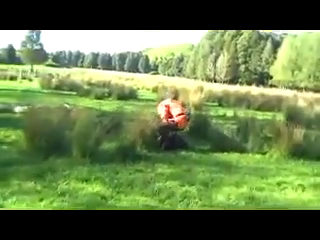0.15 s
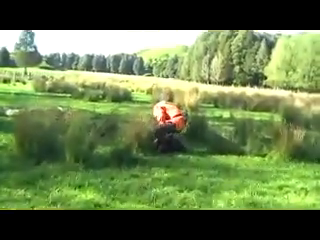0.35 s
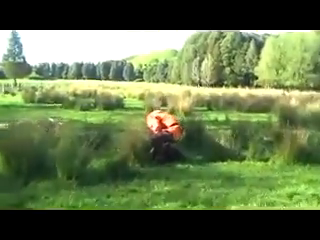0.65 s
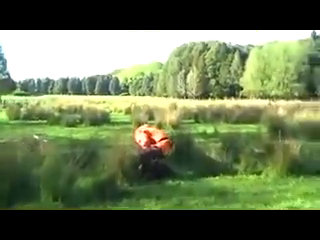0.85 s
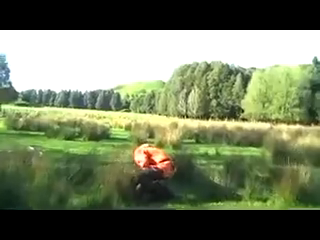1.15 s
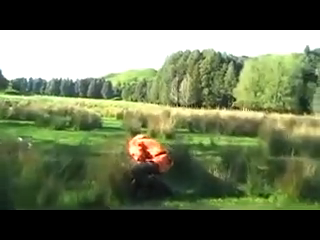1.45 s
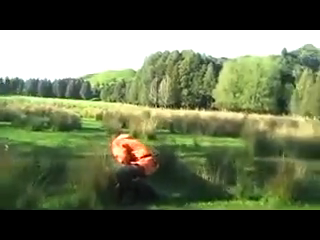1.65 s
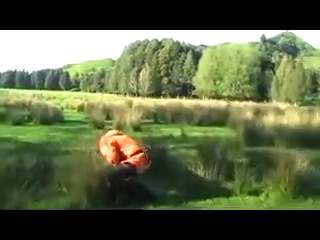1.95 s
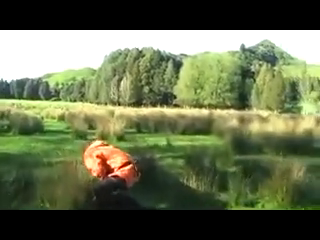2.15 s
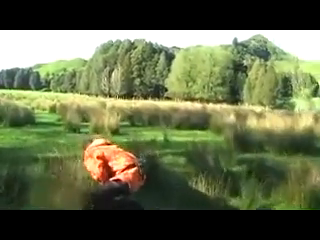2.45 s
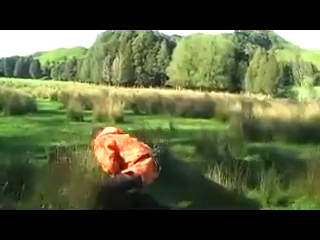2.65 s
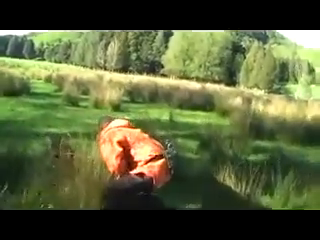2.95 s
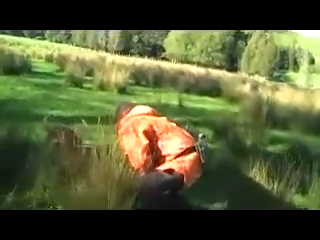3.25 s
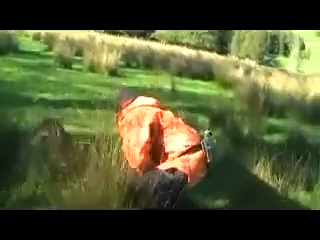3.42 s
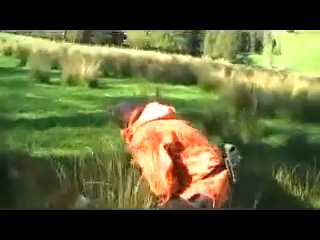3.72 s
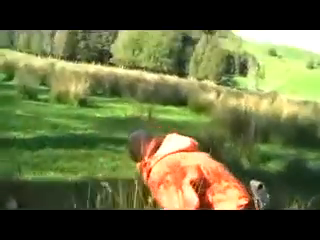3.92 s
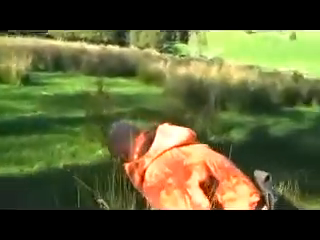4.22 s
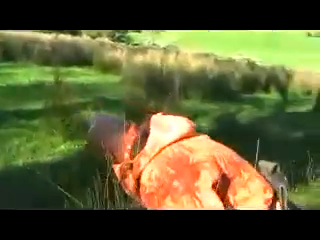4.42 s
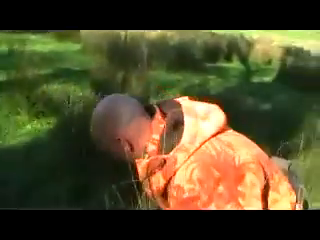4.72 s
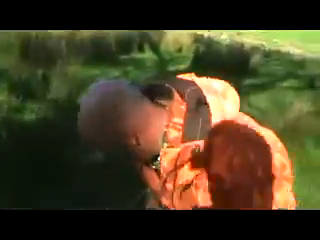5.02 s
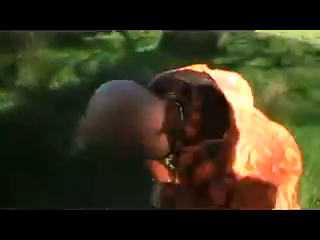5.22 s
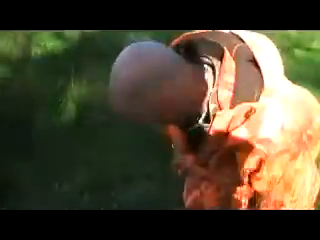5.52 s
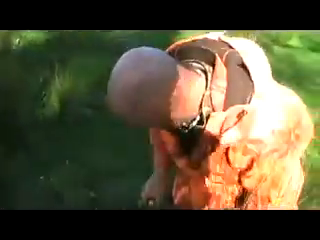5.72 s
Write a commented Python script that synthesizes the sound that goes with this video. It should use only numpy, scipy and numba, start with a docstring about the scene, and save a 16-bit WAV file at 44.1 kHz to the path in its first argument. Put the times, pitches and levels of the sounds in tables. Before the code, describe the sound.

Raspy, shrill young pig squeals, nearly continuous outdoors, split by short pauses, with feet thudding and dry grass crackling close to a handheld camera.

```python
"""A piglet held in long grass squeals four hoarse cries while a hand-held tape camera walks up to it.
Uneven fold beats chop noisy breath and click; throat resonances ring with both, and whistles lock in.
A tree line echoes the cries as scattered noise. Grass is fine grains of noise; knocks and snaps are
ringing bursts. Field and wind noise lie underneath. The camera combs out its drum buzz and limits peaks."""
import sys
import numpy as np
from scipy import signal
from scipy.fft import rfft, irfft
from scipy.io import wavfile
from scipy.ndimage import uniform_filter1d
from numba import njit

SR = 44100
rng = np.random.default_rng(int(sys.argv[2]) if len(sys.argv) > 2 else 0)


def transcribe(signal):
    """Save signal, clipped to [-1, 1], as a 16-bit WAV file at the path in sys.argv[1]."""
    frames = np.atleast_2d(signal).T
    limited = np.clip(frames, -1, 1)
    pcm = np.round(limited * 32767).astype(np.int16)
    wavfile.write(sys.argv[1], SR, pcm)


N = 258867
T = np.arange(N) / SR


def undb(db):
    """Turn decibels into a plain gain."""
    return 10 ** (np.asarray(db) / 20)


def unit(x):
    """Scale a signal to rms 1."""
    return x / np.sqrt(np.mean(x ** 2))


def curves(rows):
    """Join the columns of (time_s, ...) rows by straight lines over the whole scene."""
    s, *columns = np.transpose(rows)
    return [np.interp(T, s, column) for column in columns]


def bell(s, spread_s):
    """A smooth swell, 1 at its middle, round one moment."""
    return np.exp(-.5 * ((T - s) / spread_s) ** 2)


@njit
def svf(x, hz, width):
    """State-variable band-pass with a moving centre, gain 1 there."""
    y, state_1, state_2 = np.empty(len(x)), 0., 0.
    for i in range(len(x)):
        g, k = np.tan(np.pi * hz[i] / SR), width / hz[i]
        v = (state_1 + g * (x[i] - state_2)) / (1 + g * (g + k))
        state_1 = 2 * v - state_1
        state_2 = state_2 + 2 * g * v
        y[i] = k * v
    return y


def band(x, hz, width):
    """Apply the band-pass twice, then scale to rms 1."""
    hz = hz * np.ones(len(x))
    once = svf(x, hz, 1. * width)
    return unit(svf(once, hz, 1. * width))


def walk(rate):
    """A slow random curve, rms 1: levels held for 1 / rate seconds, then smoothed twice."""
    k = int(SR / rate)
    steps = np.repeat(rng.standard_normal(N // k + 1), k)
    smooth = uniform_filter1d(uniform_filter1d(steps, k), k)
    return unit(smooth[:N])


def shaped(points):
    """Noise with a spectrum given as (pitch_hz, level_db), scaled to rms 1."""
    hz, db = np.transpose(points)
    log_hz = np.log(np.fft.rfftfreq(N, 1 / SR) + 1)
    gain = undb(np.interp(log_hz, np.log(hz), db))
    return unit(irfft(rfft(rng.standard_normal(N)) * gain, N))


# How far each cry opens; release begins at end_s: (start_s, end_s, attack_s, release_s)
CRY_TIMES = [(-0.1, 1.668, 0.02, 0.085), (2.027, 3.382, 0.034, 0.035), (3.714, 4.432, 0.012, 0.032),
             (4.75, 5.7, 0.002, 0.045)]
SILENT_DB = -40  # depth from which a cry rises and to which it falls


def cries():
    """Opening of the cries, 0 to 1: each rises quickly, holds and falls."""
    opening = np.zeros(N)
    for start, end, attack_s, release_s in CRY_TIMES:
        rise = np.sqrt(np.clip((T - start) / attack_s, 0, 1))
        fall = np.clip(1 - (T - end) / release_s, 0, 1)
        opening += (rise * fall > 0) * undb(SILENT_DB * (1 - rise * fall))
    return opening


# Mean beat of the vocal folds and level of their tone, one list a cry: (time_s, beat_hz, tone_db)
FOLD_BEATS = [
    [(0, 240.1, -39), (.7, 247.5, -35.5), (1.0, 253.6, -39.5), (1.55, 256.9, -37.5), (1.67, 246, -35),
     (1.72, 209, -18)],
    [(2.02, 207.2, -21), (2.07, 211.4, -32), (2.1, 251.7, -42), (2.166, 275, -33), (2.49, 276.1, -29),
     (2.55, 255.2, -32.5), (2.886, 249.4, -33), (2.926, 202.7, -30.5), (3.41, 203.2, -31.5)],
    [(3.71, 210.2, -25.5), (3.86, 219.9, -34), (4.46, 212.3, -38)],
    [(4.74, 196.7, -41), (4.83, 220.3, -39), (5.0, 216, -40), (5.06, 256.1, -33), (5.29, 235.2, -33),
     (5.35, 235.1, -39), (5.44, 285.6, -33.5), (5.74, 270.3, -34)],
]
# How broken the fold beat is: (time_s, roughness from 0 to 1)
ROUGHNESS = [(0, .9), (.3, .5), (.75, .3), (1.65, .25), (1.7, .9), (2.1, .8), (2.2, .5), (2.5, .5),
             (2.56, .28), (2.89, .28), (2.92, .9), (3.7, .9), (3.9, .6), (4.4, .6), (4.75, .9), (5.0, .9),
             (5.08, .55), (5.3, .6), (5.4, .95)]


def fold_beats():
    """Uneven beating of the vocal folds; rougher folds wander further from their mean beat."""
    rough, = curves(ROUGHNESS)
    beat_hz, tone_db = curves(np.vstack(FOLD_BEATS))
    wander = np.exp(.2 * rough ** 2 * walk(150))
    phase = np.cumsum(beat_hz * wander) / SR  # counted in beats
    return rough, beat_hz, tone_db, phase


def airflow(rough, phase):
    """Torn breath: noise that bursts and fades in each beat, alone and with a click of uneven strength."""
    cycle = phase.astype(int)
    click_gain = undb(2.5 * rng.standard_normal(N // 100))
    clicks = np.diff(cycle, prepend=0) * click_gain[cycle]
    puffs = .4 + np.exp(-(phase % 1) / .3)
    air = unit(puffs * rng.standard_normal(N))
    return air, air + 0.9 * (1 - .45 * rough) * unit(clicks)


def fold_tone(rough, beat_hz, tone_db, phase):
    """A steady beat hums with one overtone; a broken one growls round the same pitch."""
    hum = np.sqrt(2) * (np.sin(2 * np.pi * phase) + 0.59 * np.sin(4 * np.pi * phase))
    growl = undb(0.5) * band(rng.standard_normal(N), beat_hz, 100)
    return undb(tone_db) * ((1 - rough) * hum + rough * growl)


# Quick pushes and lapses of breath: (time_s, swell_db, spread_s)
BREATH_PUSHES = [(0.69, 2.5, 0.029), (1.346, -2, 0.0068), (1.543, 2.5, 0.0076), (1.58, 2, 0.0051),
                 (2.043, 3, 0.016), (2.458, 4, 0.033), (2.53, -1, 0.015), (2.589, 4, 0.021),
                 (2.874, -1.5, 0.0094), (2.901, 2, 0.0071), (3.049, 0.5, 0.013), (3.775, 3, 0.015),
                 (3.807, -5, 0.0079), (3.84, 3, 0.015), (3.866, -4.5, 0.0045), (3.88, 1.5, 0.0074),
                 (3.963, -0.5, 0.0082), (4.005, 4, 0.0075), (4.029, -3, 0.0062), (4.049, 4.5, 0.0082),
                 (4.11, 5, 0.0088), (4.197, 4.5, 0.018), (4.265, 5, 0.0097), (4.324, 4.5, 0.011),
                 (4.365, 5, 0.015), (4.385, 4.5, 0.0037), (4.748, 4, 0.003), (4.778, 5, 0.014),
                 (5.069, 2, 0.0068), (5.111, -1, 0.0076), (5.347, 1.5, .015)]


def breath_pushes():
    """Add up the short swells and dips of breath, in dB."""
    return sum(db * bell(s, spread_s) for s, db, spread_s in BREATH_PUSHES)


# Shapes of throat and mouth by name: nine resonances (pitch_hz, strength_db),
# then one pair for the chest and the hiss (chest_db, hiss_db)
MOUTH_SHAPES = { "wide": [(770, -7), (1040, -52), (1570.5, -2.5), (2050, -8), (2519.5, -8), (2899.5, -17.5),
                (3979.5, -12), (4750, -28), (5950, -15), (-23.5, -27)], "bright": [(777.5, -10),
                (1044.5, -56), (1580, -6.5), (2048.5, -9), (2480, -10), (2900.5, -14), (3981, -15),
                (4900, -22), (6149.5, -16.5), (-25.5, -26)], "shrill": [(760, -15.5), (1020, -36),
                (1580, -7.5), (2050, -12.5), (2530, -1.5), (2870, -24), (3950, -14), (4950, -20),
                (6450, -18.5), (-25.5, -22)], "slack": [(697.5, -7), (1180.5, -3.5), (1481, -8),
                (1917.5, -11.5), (2300, -13), (2850, -20), (3649, -34), (4885.5, -24), (5697, -32),
                (-18.5, -29.5)], "closing": [(747.5, -7.5), (1150, -20), (1660, -4.5), (1860, -5),
                (2050, -7.5), (2750, -7.5), (4100, -14.5), (4900.5, -22), (6100, -17.5), (-24, -28)],
                "strained": [(740, -13), (970, -15), (1600, -8.5), (1870, -8.5), (2520, -12), (2940, -13.5),
                (4150, -37), (4400, -14), (6800.5, -23.5), (-24, -22)], "gaping": [(801, -13), (1131, -0.5),
                (1540, -2), (1922.5, -7), (2697.5, -26), (2858.5, -17), (3624, -28), (4865, -19),
                (6103, -18), (-15, -23)], "pinched": [(760, -14), (1020, -21), (1640, -3.5), (2000, -5.5),
                (2530, -4), (2880.5, -13.5), (4049.5, -13.5), (4900, -22), (6251, -18.5), (-24, -20.5)],
                "half shut": [(758.5, -8), (1150.5, -9), (1560, 0), (1880, -29), (2500, -14), (2920, -19.5),
                (3598.5, -22), (4798.5, -22), (6249, -22), (-24, -21.5)], "rasping": [(722, -11),
                (990, -13.5), (1620, -7), (1890, -10.5), (2400, -12), (2910, -14), (4100, -29),
                (4900.5, -12.5), (6601.5, -21), (-23, -21.5)], "narrow": [(760.5, -11), (1000.5, -13),
                (1680.5, 0), (1851, -5), (2449, -11.5), (2980, -22), (3900, -23), (4799.5, -22),
                (6102, -21.5), (-24, -26)], "hollow": [(835.5, -24.5), (980, 1), (1690, -5), (1880, -5),
                (2600, -15.5), (2900, -17.5), (3500, -33), (5001, -23.5), (5952.5, -31.5), (-29.5, -40.5)],
                "barking": [(769.5, -11), (1150, -8), (1569.5, -3.5), (1871, -4), (2550.5, -12.5),
                (3150, -19), (4001, -25), (5200, -21.5), (6798.5, -44), (-24.5, -32)], "round": [(781, -15),
                (1129.5, -6.5), (1420, -4), (1939, -12), (2250, -16), (2800.5, -16), (3638.5, -19),
                (5248.5, -23), (6094, -40), (-24.5, -45)], }
# The mouth slides from shape to shape: (time_s when reached, shape name)
MOUTH_MOVES = [(0, "wide"), (0.847, "bright"), (1.05, "bright"), (1.201, "shrill"), (1.279, "pinched"),
               (1.48, "pinched"), (1.58, "shrill"), (1.661, "closing"), (1.75, "closing"),
               (1.999, "half shut"), (2.085, "half shut"), (2.11, "rasping"), (2.2, "rasping"),
               (2.42, "strained"), (2.89, "narrow"), (2.97, "hollow"), (3.42, "hollow"), (3.7, "half shut"),
               (3.748, "half shut"), (3.775, "barking"), (4.15, "barking"), (4.43, "hollow"),
               (4.7, "half shut"), (4.749, "half shut"), (4.772, "gaping"), (4.82, "round"),
               (5.199, "round"), (5.6, "slack"), (5.87, "slack")]
# Filter width of each of the nine resonances, lowest first: width_hz
RESONANCE_WIDTHS = [240, 340, 340, 360, 380, 430, 560, 700, 1250]
DRIFT, SHIFT_DB = .01, .5  # wander of each resonance in pitch (share) and strength as the animal struggles
PUSH_TREBLE = 0.39  # a push lifts the hiss, leak and upper resonances by this share more
TREMBLE_HZ = 22  # strength of the quick pitch tremble, wider at higher pitch


def throat(air, source, push_db):
    """Chest, hiss and nine sliding resonances ring with the breath; each resonance also whistles."""
    rows = [(s, *np.ravel(MOUTH_SHAPES[name])) for s, name in MOUTH_MOVES]
    *mouth, chest_db, hiss_db = curves(rows)
    chest = undb(chest_db) * band(source, 371, 120)
    hiss = undb(hiss_db + PUSH_TREBLE * push_db) * band(air, 7460, 4100)
    ringing = chest + hiss
    for k, (hz, db, width) in enumerate(zip(mouth[::2], mouth[1::2], RESONANCE_WIDTHS)):
        hz = hz * (1 + DRIFT * walk(6))
        db = db + SHIFT_DB * walk(4.97) + PUSH_TREBLE * push_db * (hz > 3300)
        broad = band(source, hz, width)
        # a wavering strand that swells and fades at random
        waver_hz = .006 * hz * walk(12) + TREMBLE_HZ * np.sqrt(hz / 1000) * walk(160)
        strand = np.sqrt(2) * np.sin(2 * np.pi * np.cumsum(hz + waver_hz) / SR)
        strand = strand * undb(2.5 * walk(30))
        share = .5 * min((k + 1) / 3, 1)  # the lowest resonances whistle least
        # neighbouring resonances have opposite signs
        ringing = ringing + (-1) ** k * undb(db + 1.2 * walk(20)) * unit(broad + share * strand)
    # the scream holds its strength: short swells are partly evened out
    slow_power, quick_power = uniform_filter1d(ringing ** 2, 6000), uniform_filter1d(ringing ** 2, 900)
    return ringing * (slow_power / quick_power) ** .3


# Where the voice locks on one gliding pitch: (start_s, end_s, from_hz, to_hz, level_db before flicker)
WHISTLE_GLIDES = [(0, .35, 3970, 3960, -37), (.35, .73, 4000, 4060, -37), (0, .3, 5880, 6100, -44),
                  (.3, .56, 5920, 6140, -36), (.1, .7, 4730, 4760, -49), (.55, .9, 6440, 6270, -41),
                  (.62, .95, 5770, 5550, -33), (.78, .88, 3830, 3700, -40), (.98, 1.2, 5840, 6350, -38.5),
                  (.2, .55, 2605, 2604, -31.5), (.27, .5, 1596, 1557, -25), (.22, .5, 2180, 2170, -31),
                  (1.05, 1.15, 1760, 1670, -32), (1.33, 1.47, 2650, 2730, -29),
                  (2.3, 2.75, 6990, 6700, -42.5), (2.55, 2.8, 6125, 6000, -37.5),
                  (2.33, 2.7, 3990, 3940, -38), (2.1, 2.22, 2290, 2300, -27),
                  (2.18, 2.36, 1720, 1760, -25.5), (2.42, 2.5, 1600, 1625, -25),
                  (2.7, 2.88, 1572, 1531, -24.5), (2.98, 3.12, 2636, 2600, -33),
                  (3.725, 3.79, 1300, 1618, -21.5), (3.82, 3.87, 1600, 1584, -19),
                  (3.78, 3.95, 2620, 2690, -34), (4.12, 4.33, 3120, 3200, -36.5),
                  (4.16, 4.29, 1594, 1574, -25.5), (4.77, 4.86, 2820, 2700, -39),
                  (4.85, 5.0, 1251, 1394, -26), (4.96, 5.26, 1160, 1125, -22.5),
                  (5.14, 5.45, 1370, 1256, -27), (5.27, 5.45, 4730, 4950, -37.5),
                  (5.48, 5.7, 3654, 3765, -41), (5.42, 5.6, 1122, 1090, -25), (5.45, 5.68, 1273, 1253, -29),
                  (0, .22, 1550, 1567, -28), (.02, .2, 2580, 2600, -22.5), (.27, .45, 825, 830, -31.5),
                  (.52, .74, 2170, 2177, -32.5), (.57, .67, 6030, 6150, -36), (.55, .9, 2615, 2610, -27.5),
                  (.69, .81, 2035, 2030, -23), (.72, .9, 819, 834, -29.5), (.88, 1.17, 2013, 2016, -24),
                  (.97, 1.08, 4035, 3960, -26), (1.09, 1.18, 2345, 2495, -18.5),
                  (1.12, 1.23, 4120, 4200, -27.5), (1.14, 1.22, 4500, 4320, -33),
                  (1.3, 1.44, 4160, 4190, -35), (1.49, 1.58, 3830, 3760, -33.5),
                  (1.17, 1.31, 2670, 2630, -25.5), (1.2, 1.36, 2010, 1976, -22.5),
                  (1.25, 1.4, 1680, 1741, -20.5), (1.41, 1.5, 2060, 2070, -22),
                  (1.52, 1.64, 2564, 2450, -19), (1.61, 1.675, 1993, 1823, -20),
                  (2.035, 2.092, 1543, 1570, -25), (2.09, 2.2, 4840, 4820, -29),
                  (2.14, 2.3, 2465, 2500, -27), (2.18, 2.5, 4580, 4310, -39), (2.3, 2.5, 2913, 2925, -32),
                  (2.41, 2.51, 1873, 1859, -22), (2.55, 2.7, 1856, 1848, -20),
                  (2.72, 3.0, 1775, 1708, -23.5), (2.92, 3.38, 949, 960, -25.5),
                  (3.0, 3.39, 1726, 1720, -27), (3.8, 3.9, 1893, 1900, -25.5), (3.9, 4.0, 3070, 3080, -39),
                  (4.16, 4.33, 1997, 1952, -26), (4.15, 4.33, 2635, 2760, -37),
                  (3.86, 3.93, 4110, 4100, -33), (3.97, 4.09, 1576, 1570, -23.5),
                  (4.3, 4.44, 1148, 980, -23.5), (4.54, 4.6, 700, 687, -44), (4.65, 4.75, 695, 699, -49),
                  (4.77, 4.96, 993, 1145, -19.5), (4.8, 4.97, 3647, 3910, -34),
                  (4.85, 5.45, 2798, 2650, -30.5), (4.88, 4.98, 4750, 5160, -33),
                  (5.03, 5.27, 4590, 4697, -34.5), (5.0, 5.14, 1398, 1380, -22.5),
                  (5.0, 5.3, 4080, 3950, -38), (4.93, 5.08, 5230, 5240, -37), (5.1, 5.5, 3603, 3551, -38),
                  (5.26, 5.42, 1135, 1130, -22.5), (5.33, 5.62, 4908, 4864, -55)]
WHISTLE_FADE_S = 0.021


def whistles():
    """Near-pure strands that glide, tremble in pitch and flicker in strength."""
    out = np.zeros(N)
    sway, tremble_hz, flicker = .004 * walk(25), TREMBLE_HZ * walk(200), undb(3.4 * walk(70))
    for k, (start, end, from_hz, to_hz, db) in enumerate(WHISTLE_GLIDES):
        first = max(int((start - WHISTLE_FADE_S) * SR), 0)
        last = min(int((end + WHISTLE_FADE_S) * SR), N)
        at = np.arange(first, last)
        own = (at + 9973 * k) % N  # every strand trembles its own way
        glide_hz = np.interp(T[at], [start, end], [from_hz, to_hz])
        tremble_scale = max(np.sqrt(from_hz / 2000), from_hz / 2500)
        hz = glide_hz * (1 + sway[own]) + tremble_hz[own] * tremble_scale
        edge_s = np.minimum(T[at] - start, end - T[at])
        fade = np.clip(edge_s / WHISTLE_FADE_S + .5, 0, 1) ** 2
        strand = np.sqrt(2) * np.sin(2 * np.pi * np.cumsum(hz) / SR)
        out[at] += undb(db) * fade * flicker[own] * strand
    return out


# Effort behind the voice: (time_s, level_db)
VOICE_EFFORT = [(0, -12), (.4, -17.5), (.73, -14), (1.08, -13.5), (1.3, -14.5), (1.5, -18.5), (1.66, -14.5),
                (2.05, -15), (2.39, -15), (2.6, -14), (2.85, -14), (3.38, -17.5), (3.72, -18.5),
                (3.75, -14.5), (4.43, -18.5), (4.75, -17), (4.79, -12), (5.63, -14), (5.7, -17.5)]
# Air that escapes the resonances, against the effort: (time_s, level_db)
AIR_LEAK = [(0, -29), (.7, -16), (.8, -21), (1.3, -21), (1.66, -24), (2.1, -29), (2.5, -34), (2.9, -29),
            (3.4, -27), (3.75, -19), (4.4, -30), (4.8, -23), (5.1, -25), (5.45, -29), (5.7, -27)]
FLUTTER_DB = 1.0  # random flutter of the effort
UNLOCKED_LEAST = .28  # least share of power left to the rasp while the voice whistles
TREES_DB, TREES_DB_PER_S = -11.5, -3.5  # echo share of the cry, falling as the camera comes near


def piglet():
    """Join rasp, fold tone and whistles into the cry; return it and the part sent to the trees."""
    rough, beat_hz, tone_db, phase = fold_beats()
    air, source = airflow(rough, phase)
    push_db = breath_pushes()
    ringing = throat(air, source, push_db)
    effort_db = curves(VOICE_EFFORT)[0] + FLUTTER_DB * walk(45) + push_db
    tone = fold_tone(rough, beat_hz, tone_db, phase)
    leak = undb(curves(AIR_LEAK)[0] + PUSH_TREBLE * push_db) * band(air, 3860, 3800)
    chop = (1 + .7 * np.cos(2 * np.pi * phase)) / 1.12  # the fold beat chops the whistles too
    strands = whistles() * undb(push_db) * chop
    # what the whistle takes of the breath, the rasp loses
    voice_power = uniform_filter1d(ringing ** 2, 6000) * undb(2 * effort_db)
    locked = uniform_filter1d(strands ** 2, 900) / voice_power
    rasp = (ringing + leak) * np.sqrt(np.clip(1 - locked, UNLOCKED_LEAST, 1))
    cry = cries() * (rasp * undb(effort_db) + tone) + strands
    return cry, cry * undb(TREES_DB + TREES_DB_PER_S * T)


TREES_T60_S = 0.44  # time for the echo tail to fall by 60 dB


def trees(x):
    """A thin scatter of echoes that dies away, duller than the cry, unlike on the two ports."""
    t = T[:SR]
    fade = undb(-60 * t / TREES_T60_S) * np.clip(t / 0.013, 0, 1)
    shared, side = rng.standard_normal((2, SR)) * fade
    tail = shared + 0.15 * side * np.array([[1], [-1]])
    tail = signal.lfilter([1], [1, -.6], tail)  # soften the treble
    tail = tail / np.sqrt(np.sum(tail[0] ** 2))
    return signal.fftconvolve(x[None], tail, axes=1)[:, :N]


# Grass brushing on legs: (time_s, level_db before the lift in each cry)
GRASS_LEVELS = [(0, -55), (1.8, -50), (2.02, -52.5), (3.42, -45), (3.5, -41), (3.63, -36), (3.71, -39.5),
                (4.47, -42.5), (4.65, -49), (4.676, -41.5), (4.72, -49.5), (4.75, -38.5), (5.74, -44.5),
                (5.77, -53.5), (5.87, -62)]
CRY_LIFT_DB = 3  # the rustle rises by this much in each cry


def grass():
    """Dense tiny grains of blades slipping past cloth, with a duller swish under them."""
    db = curves(GRASS_LEVELS)[0] + CRY_LIFT_DB * cries()
    grain_gain = undb(2 * rng.exponential(size=N // 40 + 1)).repeat(40)[:N]
    grains = rng.standard_normal(N) * grain_gain
    crisp = band(grains, 6500, 9000) * undb(2 * walk(18))
    swish = undb(3) * band(grains, 800, 1200) * undb(3 * walk(12))
    return undb(db) * (crisp + swish)


# Spectrum of the quiet field: (pitch_hz, relative level_db)
FIELD_SPECTRUM = [(59, -57), (100, -9), (176, 8), (599, 8), (718, 8.5), (860, -7), (1510, 3.5), (6830, -11),
                  (8020, -37), (12200, -39), (15900, -53), (22000, -120)]
FIELD_DB = -47


def field():
    """Steady shaped noise, partly shared by the two ports and partly separate."""
    shared = shaped(FIELD_SPECTRUM)
    separate = np.array([shaped(FIELD_SPECTRUM), shaped(FIELD_SPECTRUM)])
    return undb(FIELD_DB) * (shared + 0.86 * separate)


# Thuds of the hand-held camera, as swells of the rumble: (time_s, swell level_db, spread_s)
CAMERA_THUDS = [(1.168, -59, 0.034), (1.723, -36, 0.015), (2.031, -53, 0.018), (2.245, -54, 0.06),
                (3.63, -44, 0.064), (4.48, -56, 0.032), (4.779, -51, 0.051), (5.173, -54, 0.041),
                (5.49, -53, 0.044)]
RUMBLE_DB = -59  # base level of wind on the ports


def rumble():
    """Low noise of wind on the ports, swelling into a thud when the camera is jolted."""
    shared = band(rng.standard_normal(N), 142, 110)
    separate = np.array([band(rng.standard_normal(N), 72.4, 70) for _ in range(2)])
    thuds = sum(undb(db) * bell(s, spread_s) for s, db, spread_s in CAMERA_THUDS)
    swell = undb(RUMBLE_DB) + thuds
    return swell * undb(2 * walk(9.7)) * (shared + 0.63 * separate)


def bursts(events, width_share):
    """A sharp blow and a decaying noise tail, each event ringing round its own pitch."""
    out, t = np.zeros(N + 6000), T[:6000]
    noise = rng.standard_normal((len(events), 6000))
    for (s, db, hz, ring_s), n in zip(events, noise):
        blow = (n + 3 * (t == 0)) * undb(-60 * t / ring_s)
        hit = band(blow, hz, width_share * hz)
        first = int(s * SR)
        out[first:first + 6000] += undb(db) * hit / np.abs(hit).max()
    return out[:N]


# Dull knocks of feet and hands: (time_s, peak_db, pitch_hz, ring_s)
KNOCK_EVENTS = [(1.729, -23, 1800, 0.087), (3.504, -15, 800, 0.026), (3.506, -26, 213, 0.041),
                (3.574, -21, 705, 0.14), (3.577, -23, 234, 0.051), (3.609, -29, 196, 0.038),
                (3.59, -28, 843, 0.05), (3.643, -24, 600.2, 0.058), (3.669, -22, 668, 0.059),
                (3.68, -24, 749.8, 0.046), (3.707, -23, 800, 0.046), (4.475, -25.5, 360, 0.064),
                (4.509, -29, 689.6, 0.065), (4.538, -28.5, 1420, 0.088), (4.668, -28, 1609, 0.07)]


def knocks():
    """Feet and hands strike: short noise bursts in a fairly broad band."""
    return bursts(KNOCK_EVENTS, 0.76)


# Snapping stems: (time_s, peak_db, pitch_hz)
SNAP_EVENTS = [(1.9645, -36, 7730), (3.29, -21, 6180), (3.4994, -26, 5006), (3.635, -17, 5940),
               (3.784, -15, 4854), (3.8221, -19, 4860), (3.9974, -24, 4150), (4.0495, -17, 7300),
               (4.1128, -18, 5300), (4.2605, -15, 4970), (4.3102, -20, 5990), (4.3834, -23, 6450),
               (4.4164, -23, 6480), (4.493, -26, 9160), (4.6536, -26, 6780), (4.7271, -24, 4300)]


def snaps():
    """Stems snap: bright, broad bursts that fall by 60 dB in 0.025 s before filtering."""
    return bursts([(*row, .025) for row in SNAP_EVENTS], 1.06)


# Right microphone port against left: (pitch_hz, level_db, phase_radians)
RIGHT_PORT = [(60, -15, -0.99), (122, -2, -1.6), (248, -9, 0.2), (450, -4.5, -0.85), (800, -5.5, 0.65),
              (1360, -2.5, -0.16), (2500, -4, -0.17), (3370, -3, -0.34), (6650, -1.5, -0.29),
              (11700, -4.5, -0.29)]


def ports(x):
    """The right port hears its channel weaker and shifted in phase, by amounts that vary with pitch."""
    hz, db, turn = np.transpose(RIGHT_PORT)
    log_hz = np.log(np.fft.rfftfreq(2 * N, 1 / SR) + 1)
    gain = undb(np.interp(log_hz, np.log(hz), db))
    shift = np.exp(1j * np.interp(log_hz, np.log(hz), turn))
    right = irfft(rfft(x[1], 2 * N) * gain * shift, 2 * N)[:N]
    return np.array([x[0], right])


def scene():
    """Cry, echo, grass, knocks and snaps over a quiet field and wind rumble."""
    cry, far = piglet()
    near = cry + grass() + knocks() + snaps()
    return undb(2.5) * ports(near + trees(far) + field() + rumble())


LIMIT_DB = -11


def limiter(x):
    """Gain control: average power over 3 ms above the limit is pulled most of the way back."""
    loud = np.sqrt(uniform_filter1d(np.mean(x ** 2, axis=0), 130) + 1e-12)
    return x * np.minimum(1, undb(LIMIT_DB) / loud) ** .8


DRUM_LAG = 294  # samples in one turn of the head drum
NOTCH_ZERO, NOTCH_POLE = .95, .54  # depth and narrowness of the comb's notches
BUZZ_DB, TOP_HZ = -62, 12000  # buzz level before the final filters; top of the sound


def record(dry):
    """A comb cancels what repeats each drum turn; peaks are limited, treble buzz joins, bass and top are cut."""
    once, turn = signal.unit_impulse(DRUM_LAG + 1), signal.unit_impulse(DRUM_LAG + 1, DRUM_LAG)
    notched = signal.lfilter(once - NOTCH_ZERO * turn, once - NOTCH_POLE * turn, dry) * undb(-4.5)
    pulses = 1. * (np.arange(N) % (DRUM_LAG // 2) == 0)  # two a drum turn
    buzz = undb(BUZZ_DB) * band(pulses, 8000, 2000)
    body_filter = signal.butter(2, [70, 9500], "band", fs=SR, output="sos")
    thin = signal.sosfilt(body_filter, limiter(notched) + buzz)
    return signal.sosfilt(signal.ellip(8, .2, 70, TOP_HZ, fs=SR, output="sos"), thin)


dry = scene()
out = record(dry)
transcribe(out)
```